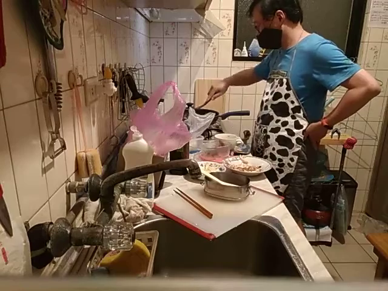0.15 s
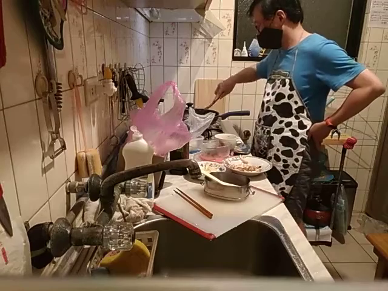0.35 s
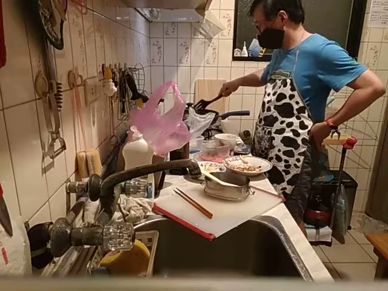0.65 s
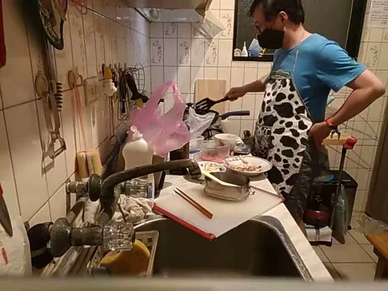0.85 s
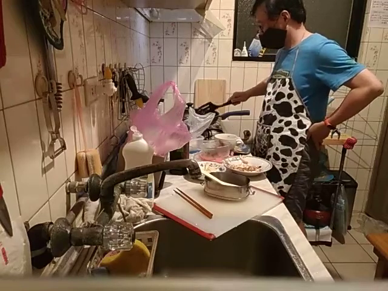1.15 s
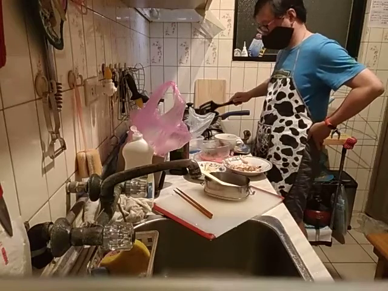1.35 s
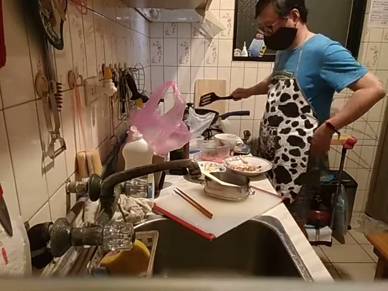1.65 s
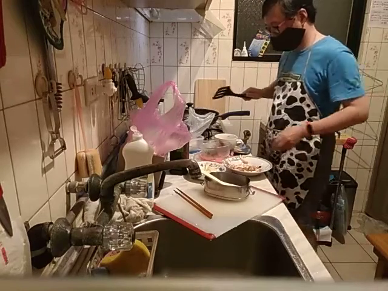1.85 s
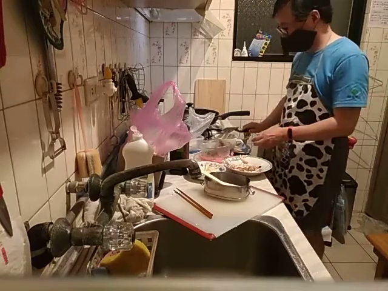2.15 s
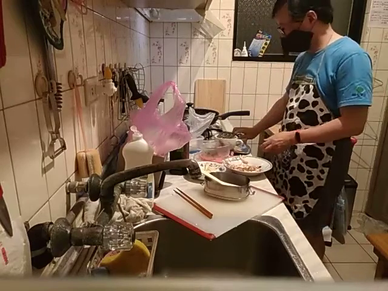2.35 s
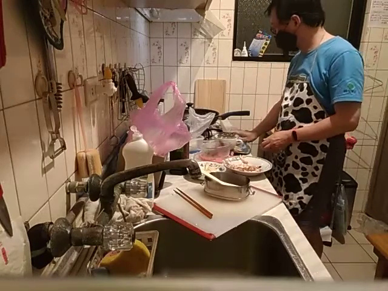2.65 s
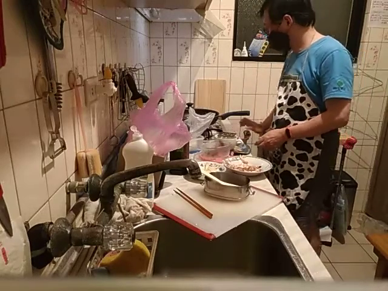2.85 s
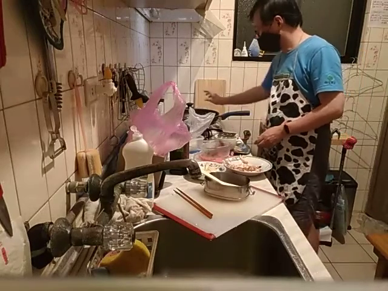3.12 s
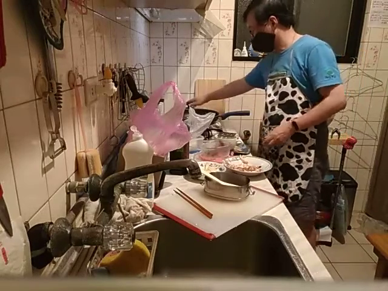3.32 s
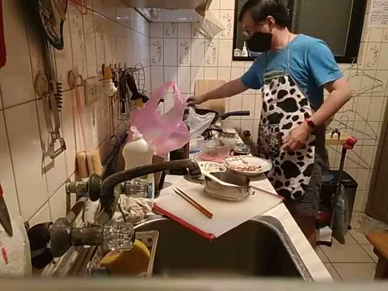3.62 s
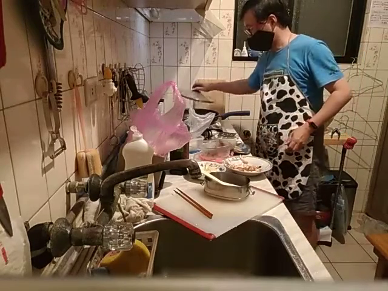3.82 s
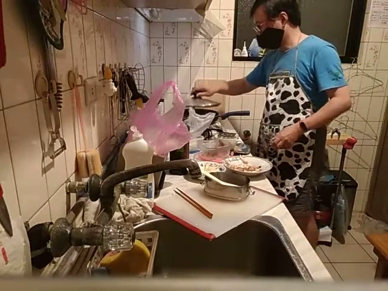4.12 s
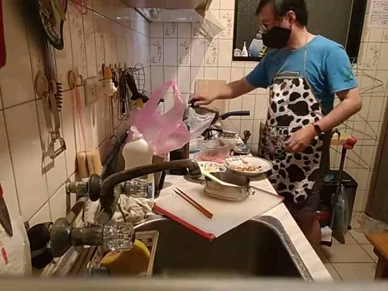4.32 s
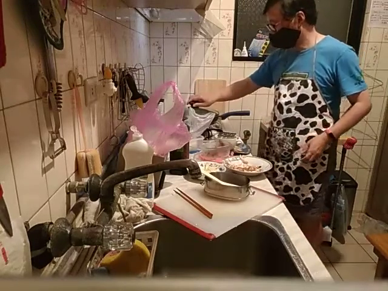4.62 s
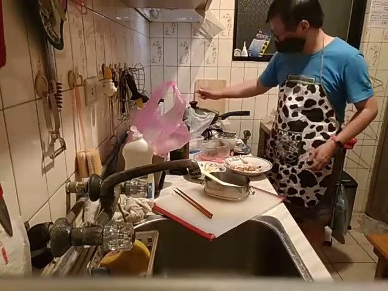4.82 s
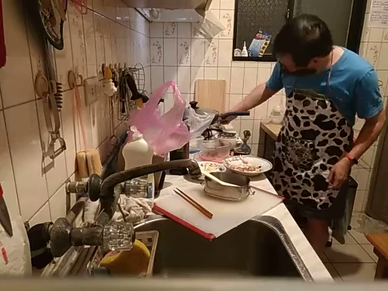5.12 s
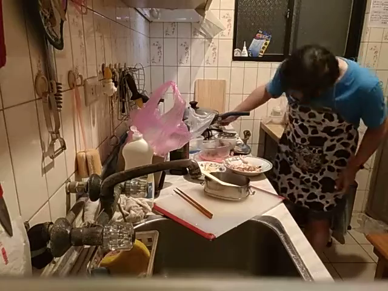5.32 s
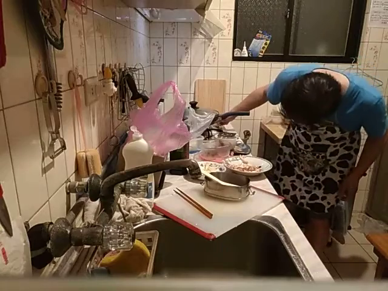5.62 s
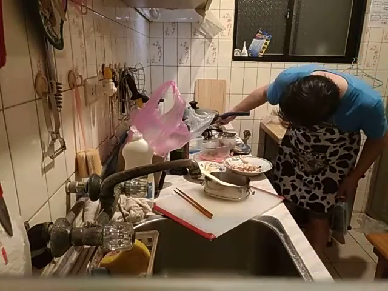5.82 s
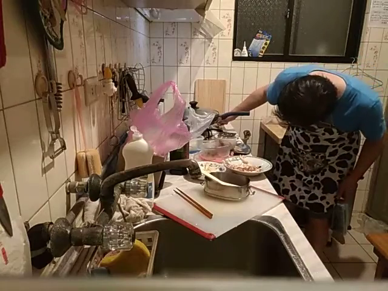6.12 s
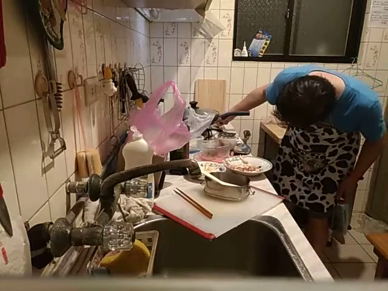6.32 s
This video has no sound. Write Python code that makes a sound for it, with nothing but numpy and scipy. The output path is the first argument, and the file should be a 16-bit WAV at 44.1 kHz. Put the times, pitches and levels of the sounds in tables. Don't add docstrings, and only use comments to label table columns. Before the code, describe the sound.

Throughout, a kitchen exhaust fan roars in its duct, a low airy rumble with a faint hum swelling and wavering, over a fine, bright hiss of oil frying in a wok. A small spit flares at 0.3 s, and a blade scrapes softly near 0.6 s. From about 1.0 to 1.5 s a metal spatula knocks four times on the rim, roughly 0.2 s apart and growing harder, each a sharp short clank followed by the wok rattling on its grate. Oil spits around 2.0-2.15 s; the blade taps lightly at 2.3 s and lands on the counter with a woody clack at 2.5 s. Only fan and sizzle, with tiny spits near 3 s, continue until 4.35 s, when a lid drops and rattles, ending with a small click at 4.6 s. The sizzle stays muffled until the end at about 6.4 s. Tight tiled-room reflections, stereo phone by the sink.

```python
import sys
import numpy as np
from scipy import signal
from scipy.fft import irfft
from scipy.io import wavfile
from scipy.ndimage import uniform_filter1d

SR = 44100
rng = np.random.default_rng(int(sys.argv[2]) if len(sys.argv) > 2 else 0)


def boost(x):
    u = np.asarray(x, float) / 20
    return 10 ** u


def dump_mix(stems):
    frames = np.atleast_2d(stems).T
    limited = np.clip(frames, -1, 1)
    pcm = np.round(limited * 32767).astype(np.int16)
    wavfile.write(sys.argv[1], SR, pcm)


N = 285327

# (frequency [Hz], density [dB per Hz])
FAN_AIR = [(12, -80), (20, -43.5), (111, 2), (235, -16.5), (299, -9), (332, -18.5), (360, -8.5),
           (401, -17.5), (553, -11.5), (762, -23.5), (919, -15.5), (1050, -19.5), (1750, -23),
           (2280, -31.5), (12000, -55.5), (15600, -65), (22000, -120)]
# (frequency [Hz], width [Hz], level over the noise [dB])
DUCT_RESONANCES = [(70.7, 19, 4.5), (92.5, 9.7, 6.5), (121.43, 8.3, 7.5), (160.6, 12, 3.5),
                   (197.7, 25, 7.5), (297.4, 17, 7.5), (362, 19, 3), (495.5, 31, 6), (556, 31, 6),
                   (646.4, 35, 7.5), (693, 66, 7), (911.4, 18.7, 8.5), (1370, 264, -8), (1703, 110, 6.5),
                   (1870, 140, 5.5), (2780, 450, 4.5)]
# (time [s], half width [s], level [dB])
BLADE_TONE_SWELLS = [(.1, 0.42, -50), (.62, 0.039, -42), (.87, 0.11, -43.5), (1.75, 0.16, -45),
                     (2.4, 0.19, -42.5), (3.0, 0.16, -45.5), (3.31, 0.054, -42), (3.7, 0.17, -43.5),
                     (4.75, 0.12, -44.5), (5.16, 0.035, -47), (5.5, 0.27, -45), (5.9, .1, -46),
                     (6.33, 0.036, -45)]
# (frequency [Hz], density [dB per Hz])
HISS_COLOUR = [(1180, -13), (2000, -15), (2180, -4), (4020, -5.5), (5100, -4.5), (5820, -8), (9130, -9.5),
               (12800, -29), (14800, -28), (16100, -43), (16500, -41)]
# (time [s], level [dB])
FRYING = [
    (0, -52),
    (.95, -51.5),
    (1.1, -56.5),
    (1.7, -51.5),
    (1.92, -52.5),
    (4.05, -52),
    (4.3, -56),
    (4.6, -61.5),
    (6.47, -60.5),
]
# (time [s], lift [dB])
OIL_SPITS = [
    (.33, 2),
    (1.98, 3.6),
    (2.15, 4.2),
    (2.75, 2.2),
    (3.03, 1.8),
]
# (time [s], highest frequency that escapes [Hz])
LID_CLOSED = (4.4, 13300)

# (frequency [Hz], correlation)
PORT_LIKENESS = [(60, 0.96), (130, 1), (290, 0.93), (640, 0.84), (1410, 0.0079), (3100, 0.1), (6820, -0.43),
                 (15000, 0.49)]
# (frequency [Hz], left minus right [dB])
PORT_BALANCE = [(60, -1), (120, 0), (240, -1), (480, -1), (950, -2), (1890, 1.0), (3770, -1.5), (7520, -4),
                (15000, 7)]
# (lowest [Hz], highest [Hz])
MIC_BAND = (38, 15950)
# (frequency [Hz], time to fall 60 dB [s])
ROOM_DECAY = [(200, 0.34), (800, 0.14), (3000, 0.19), (8000, 0.19), (15000, 0.27)]

# (frequency [Hz], level [dB], time to fall 60 dB [s])
LID_MODES = [(352, -1, 0.13), (412, 1.5, 0.095), (470, -9, 0.13), (581, -10.5, 0.32), (913, -15.5, 0.2),
             (983, -12.5, 0.057), (1980, -22, 0.084)]
COUNTER_MODES = [(410, 0, 0.15), (630, -14, 0.069), (896, 7.5, 0.061), (1170, -9, .05), (1410, -10, 0.05),
                 (1900, 6.5, .08), (2300, 1, .06), (2670, 5, 0.054), (3200, -16, .05)]
BLADE_MODES = [(946, 3, 0.14), (1000, 7.5, 0.058), (1826, 2.5, 1.2), (4440, -15, .14), (8441, -18, .05)]
GRATE_MODES = [(65.3, -5, 0.15), (112, -5, 0.13), (297, 2, 0.033), (412, 2.5, 0.072), (480, -0.5, 0.065),
               (570, 3.5, 0.11), (630, -0.5, 0.17), (1023, 1, 0.044), (1805, 1.5, 0.055)]
WOK_MODES = [(400, -4.5, 0.17), (583.4, 3.5, 0.14), (810, -5, .12), (870, -19, .1), (1010, 14.5, 0.049),
             (1135, 11.5, 0.15), (1220, -5, 0.23), (1660, -24, 0.081), (1974, 5.5, 0.043), (2140, -26, .12),
             (2390, -33, 0.068), (2846, 0, 0.069), (2970, -4.5, 0.17), (3260, -18, .15), (3550, -3.5, .045),
             (3670, -5, .045), (4408, 0.5, 0.08), (4800, -20, 0.092), (5330, -6, 0.08), (6260, -8, 0.059),
             (7160, -13, .1), (8400, 0.5, 0.055), (8300, -20, 0.043), (9400, -9, 0.062), (10600, -19, .05),
             (12200, -24, .05), (14470, -10, 0.045)]
# (frequency [Hz], density [dB per Hz])
LID_CLICK = [(24, -57), (50, -9), (244, -16.5), (355, -7), (502, -13), (568, -4), (676, -14.5), (1490, -22),
             (9360, -37.5), (13900, -58), (15000, -76.5)]
COUNTER_CLICK = [(120, -39), (200, -26), (403, -8), (628, -9), (1800, -4), (2160, -22), (2750, -12),
                 (3430, -18.5), (14800, -38), (16500, -65)]
BLADE_CLICK = [(180, -25), (300, -8), (820, -11), (907, 1), (1330, -20), (1770, -14), (1960, -17.5),
               (8580, -30), (15200, -54), (16500, -55)]
GRATE_CLICK = [(24, -93), (50, -21), (124, 5), (217, -20.5), (579, -4), (721, -9), (1920, -10.5),
               (2460, -15), (6880, -24.5), (15800, -51)]
WOK_CLICK = [(120, -46), (200, -29.5), (1070, -6.5), (1360, -15), (1900, -12.5), (4060, -25.5), (5250, -16),
             (5870, -26), (8330, -23), (15000, -48.5), (16500, -49)]

# (time [s], level [dB], chatter [s], brightness [dB per octave], ring share [dB])
LID_CONTACTS = [
    (4.342, -27, 0.0054, 0.5, 2),
    (4.357, -26.5, 0.015, 0.4, 1.5),
    (4.428, -37, 0.015, -0.82, -5),
    (4.443, -33.5, .012, 0.49, -6),
    (4.49, -40, 0.03, -1.2, -12),
    (4.555, -45, 0.014, -0.29, -9),
    (4.61, -34.5, .002, -3, -4),
]
# (time [s], level [dB], chatter [s], brightness [dB per octave], ring share [dB])
LAY_DOWN = [
    (2.49, -33.5, 0.0006, -.8, -1.5),
    (2.507, -37, 0.006, -2.2, -5),
]
# (time [s], level [dB], chatter [s], brightness [dB per octave], ring share [dB])
STIR_CONTACTS = [
    (.56, -56, 0.0034, 16, -22),
    (.598, -44, 0.016, -1.5, -10),
]
# (time [s], level [dB], chatter [s], brightness [dB per octave], ring share [dB])
BLADE_TAPS = [
    (2.294, -39, .001, 2.5, 4),
    (2.317, -42, 0.008, 4, -12),
]
# (time [s], level [dB], chatter [s], brightness [dB per octave])
WOK_ROCKS = [
    (1.005, -31.5, 0.015, -1.9),
    (1.03, -31.5, 0.039, -1.2),
    (1.218, -28, 0.056, -0.18),
    (1.415, -28.5, 0.056, 0.7),
    (1.47, -35, 0.02, -0.2),
    (1.618, -28.5, 0.033, 0.3),
    (1.66, -31, 0.046, -0.9),
    (4.432, -39.5, 0.023, -1.5),
    (4.5, -39, 0.12, -3),
    (4.6, -38, 0.01, -4),
]
# (time [s], edge level [dB], gap to the flat [s], flat level [dB])
RIM_KNOCKS = [
    (.974, -33, .006, -25.5),
    (1.149, -29, .008, -23.5),
    (1.338, -29, .006, -22),
    (1.532, -28.5, .010, -21.5),
]
# (chatter [s], brightness [dB per octave], ring share [dB], free ring [s])
EDGE_TOUCH = (.009, 1.5, -14.5, -1.32)
FLAT_LANDING = (0.01, -0.2, -2.5, 0.3)
DIRECT_RING = {"knock": 1, "rock": -1.5, "tap": 3.5, "laid": -15, "lid": -1}
FREE_RING = {"rock": 0.11, "stir": 0.022, "tap": 0.079, "laid": 0.07, "lid": .05}


def evened(x):
    return x / np.sqrt(np.mean(x ** 2) + 1e-20)


def read(points, hz):
    f, value = np.transpose(points)
    return np.interp(np.log(hz + 1), np.log(f + 1), value)


def curve(points):
    s, value = np.transpose(points)
    return np.interp(np.arange(N) / SR, s, value)


def ports(left, other, hz):
    same = np.clip(read(PORT_LIKENESS, hz), -1, 1)[:, None]
    right = same * left + np.sqrt(1 - same ** 2) * other
    right = right * np.exp(-2j * np.pi * 0.00005 * hz)[:, None]
    tilt = boost(read(PORT_BALANCE, hz) / 2)[:, None]
    return np.array([left * tilt, right / tilt])


def diffuse(shape_db, size, length, patchy_db=0, flicker_db=0):
    hop = size // 4
    hz = np.fft.rfftfreq(size, 1 / SR)
    s = np.arange(length // hop + 5) * hop / SR
    a, b, c, d, patches = rng.standard_normal((len(s), len(hz), 5)).T
    patches = uniform_filter1d(patches, size=8, axis=0)
    patches = evened(uniform_filter1d(patches, size=8, axis=1))
    flicker = evened(uniform_filter1d(rng.exponential(1, len(s)) - 1, size=5))
    level_db = shape_db(hz[:, None], s) + patchy_db * patches + flicker_db * flicker
    z = ports(a + 1j * b, c + 1j * d, hz) * boost(level_db)
    return signal.istft(z, nperseg=size, noverlap=size - hop)[1][:, :length]


def fan():
    def shape_db(hz, s):
        lift = 1
        for f, width, db in DUCT_RESONANCES:
            lift = lift + (boost(2 * db) - 1) / (1 + (2 * (hz - f) / width) ** 2) ** 2
        return read(FAN_AIR, hz) + 10 * np.log10(np.maximum(lift, .01)) - 60 * (hz > 13500)

    air = boost(-34.13) * evened(diffuse(shape_db, size=4096, length=N, patchy_db=0.66))
    wobble = uniform_filter1d(rng.standard_normal(N), size=1500)
    wobble = evened(uniform_filter1d(wobble, size=1500))
    t = np.arange(N) / SR
    level = boost(-61.5)
    for s, half, db in BLADE_TONE_SWELLS:
        level = level + boost(db) * np.exp(-((t - s) / half) ** 2)
    blade_pass_hz = 365
    return air + np.sqrt(2) * level * np.sin(2 * np.pi * blade_pass_hz * t + 0.49 * wobble)


def sizzle():
    shut_s, escape_hz = LID_CLOSED

    def shape_db(hz, s):
        shut = s > shut_s
        top_db = np.where(shut, 1.4, 3)
        top_db = top_db * (np.minimum(hz, MIC_BAND[1]) / 9000) ** 3
        return read(HISS_COLOUR, hz) + top_db - 50 * (hz > escape_hz) * shut

    hiss = diffuse(shape_db, size=256, length=N, patchy_db=2.0, flicker_db=-0.25)
    t = np.arange(N) / SR
    spit_decay_s = 0.022
    spit_db = sum(db * (t > s) * np.exp(-abs(t - s) / spit_decay_s) for s, db in OIL_SPITS)
    return boost(curve(FRYING) + spit_db) * hiss / np.std(hiss[:, :SR])


def kitchen():
    def shape_db(hz, s):
        return -60 * s / np.maximum(read(ROOM_DECAY, hz), .03)

    tail = diffuse(shape_db, size=256, length=SR // 3)
    tail *= 1 - np.exp(-np.arange(SR // 3) / SR / 0.0025)
    tail /= np.sqrt((tail ** 2).sum() / 2)
    tail[:, 0] += boost(-17)
    return tail


def contact_click(colour, bright_db, hz):
    log_gain = np.log(boost(read(colour, hz) + bright_db * np.log2((hz + 50) / 1000)))
    circle = np.concatenate([log_gain, log_gain[-2:0:-1]])
    return irfft(np.exp(log_gain - 1j * signal.hilbert(circle).imag[:len(hz)]))


def struck(contacts, modes, colour, direct_db):
    t, room, out = np.arange(8192) / SR, kitchen(), np.zeros((2, N))
    hz = np.fft.rfftfreq(len(t), 1 / SR)
    fade = signal.windows.tukey(2 * len(t), .2)[len(t):]
    for s, db, chatter, bright_db, ring_db, free in contacts:
        hit = rng.random(len(t)) < 900 / SR
        burst = rng.standard_normal(len(t)) * hit * np.cos(np.pi / 2 * np.clip(t / chatter, 0, 1))
        burst[0] = 2.9
        polarity = np.sign(rng.random(len(modes)) - .5)
        spot_db = 1.8 * rng.standard_normal(len(modes))
        ring = np.zeros(len(t))
        for (f, mode_db, t60), sign, spot in zip(modes, polarity, spot_db):
            level_db = mode_db + spot + bright_db * np.log2(f / 1000) - 60 * t / t60
            ring += boost(level_db) * np.sin(2 * np.pi * f * t) * sign
        ring = boost(ring_db) * evened(ring * fade)
        click = evened(contact_click(colour, bright_db, hz))
        sound = signal.fftconvolve(signal.fftconvolve(burst, click + ring)[None], room, axes=1)
        sound[:, :2 * len(t) - 1] += boost(direct_db) * signal.fftconvolve(burst, ring)
        held_s = np.maximum(np.arange(sound.shape[1]) / SR - free, 0)
        sound *= boost(-450 * held_s)
        sound *= boost(db) / np.sqrt((sound ** 2).sum() / (2 * 0.11 * SR))
        part = out[:, round(s * SR):][:, :sound.shape[1]]
        part += sound[:, :part.shape[1]]
    return out


def choked(contacts, longest, by_next=False):
    gaps = np.diff([row[0] for row in contacts], append=np.inf)
    return [(*row, min(longest, gap) if by_next else longest) for row, gap in zip(contacts, gaps)]


def lid_seating():
    contacts = choked(LID_CONTACTS, FREE_RING["lid"], by_next=True)
    return struck(contacts, LID_MODES, LID_CLICK, DIRECT_RING["lid"])


def laid_spatula():
    contacts = choked(LAY_DOWN, FREE_RING["laid"], by_next=True)
    return struck(contacts, COUNTER_MODES, COUNTER_CLICK, DIRECT_RING["laid"])


def spatula_blade():
    contacts = choked(STIR_CONTACTS, FREE_RING["stir"]) + choked(BLADE_TAPS, FREE_RING["tap"])
    return struck(contacts, BLADE_MODES, BLADE_CLICK, DIRECT_RING["tap"])


def rocking_wok():
    contacts = choked([(*row, -2.5) for row in WOK_ROCKS], FREE_RING["rock"])
    return struck(contacts, GRATE_MODES, GRATE_CLICK, DIRECT_RING["rock"])


def rim_knocks():
    contacts = []
    for s, edge_db, gap, flat_db in RIM_KNOCKS:
        contacts.append((s, edge_db, *EDGE_TOUCH))
        contacts.append((s + gap, flat_db, *FLAT_LANDING))
    return struck(contacts, WOK_MODES, WOK_CLICK, DIRECT_RING["knock"])


def scene():
    wok = rim_knocks() + rocking_wok()
    spatula = spatula_blade() + laid_spatula()
    lid = lid_seating()
    return fan() + sizzle() + wok + spatula + lid


def top_cut(x):
    return signal.sosfilt(signal.butter(12, 16650, fs=SR, output="sos"), x)


def record(dry):
    low_hz, high_hz = MIC_BAND
    band = signal.sosfilt(signal.butter(2, low_hz, "high", fs=SR, output="sos"), dry)
    top_filter = signal.firwin(255, high_hz, window=("kaiser", 7), fs=SR)
    mix = signal.oaconvolve(band, top_filter[None], "same")
    return top_cut(mix)


dry = scene()
out = record(dry)
dump_mix(out)
```